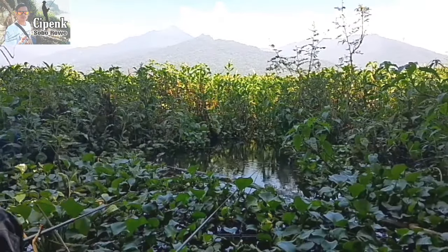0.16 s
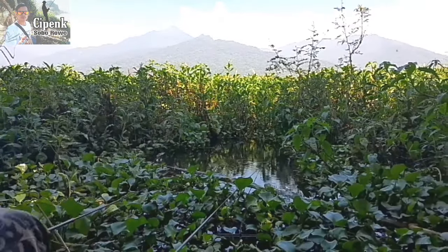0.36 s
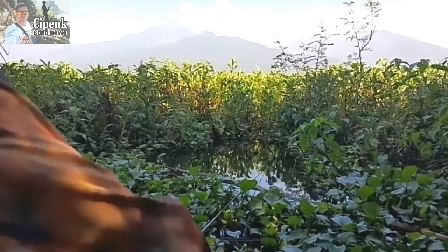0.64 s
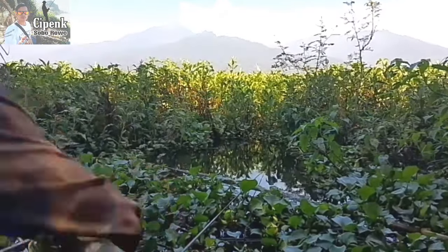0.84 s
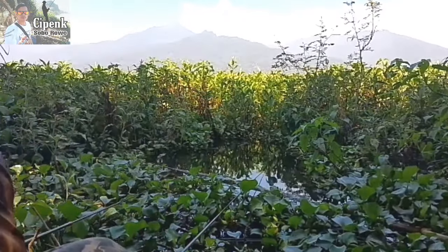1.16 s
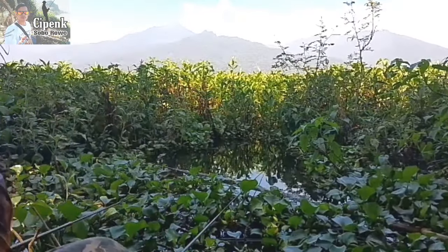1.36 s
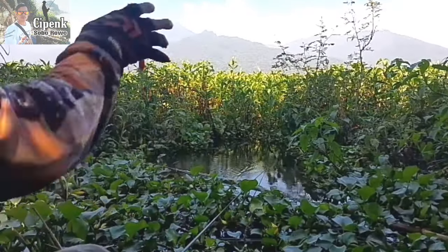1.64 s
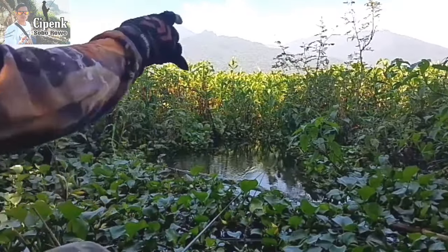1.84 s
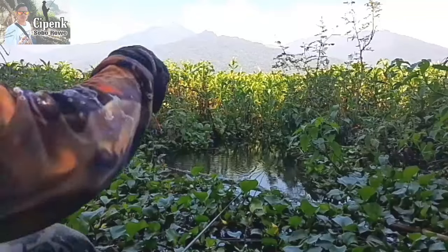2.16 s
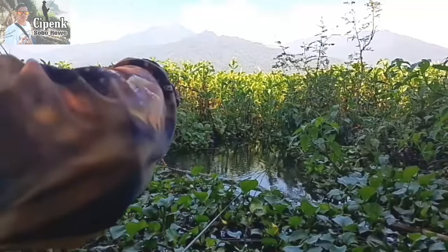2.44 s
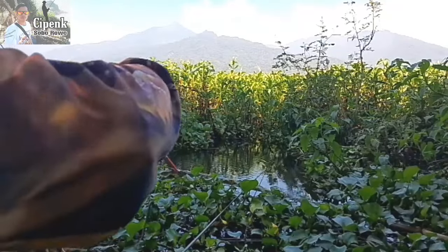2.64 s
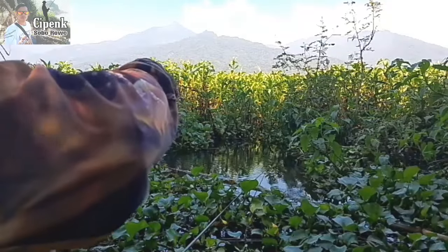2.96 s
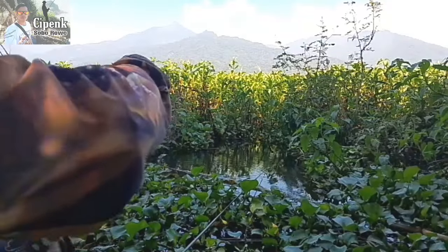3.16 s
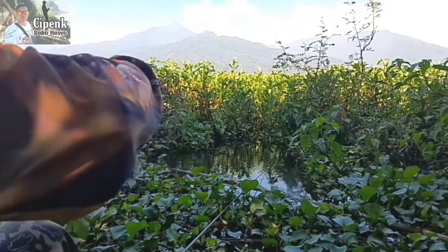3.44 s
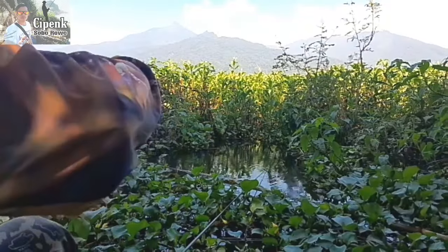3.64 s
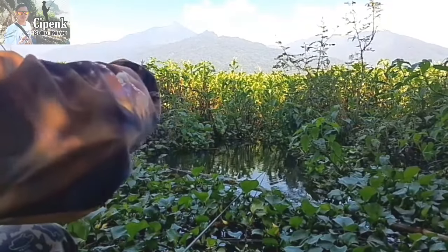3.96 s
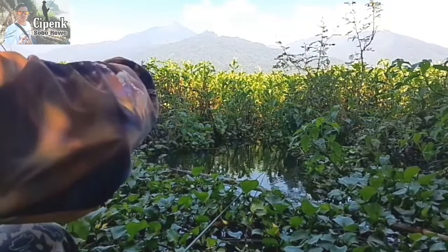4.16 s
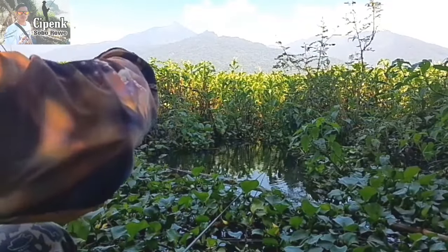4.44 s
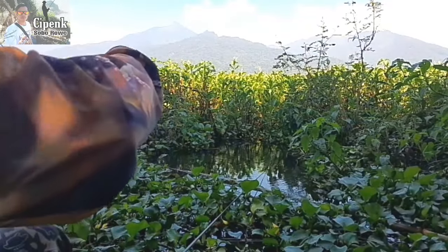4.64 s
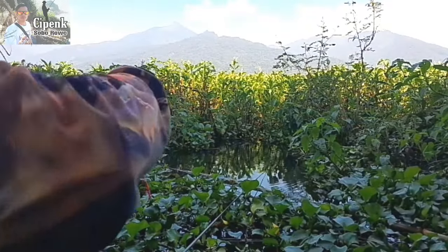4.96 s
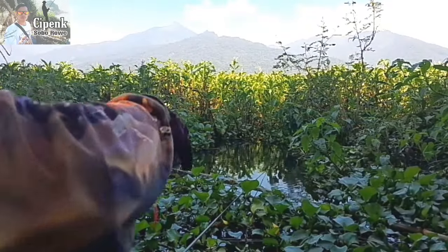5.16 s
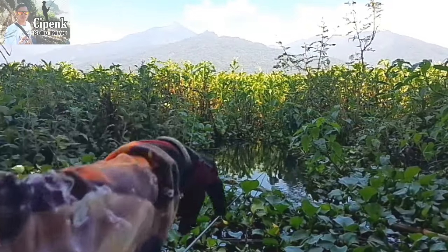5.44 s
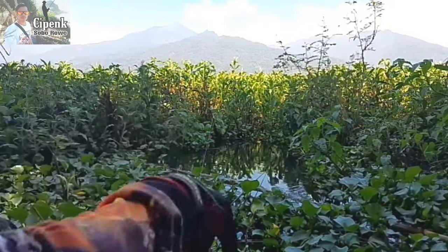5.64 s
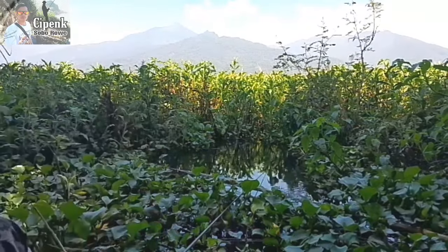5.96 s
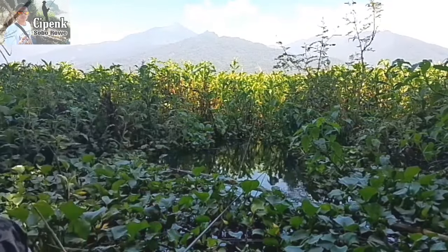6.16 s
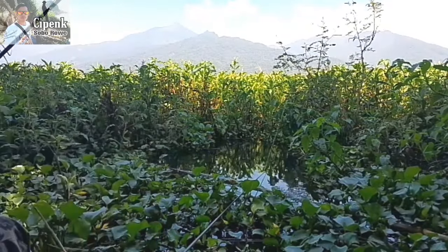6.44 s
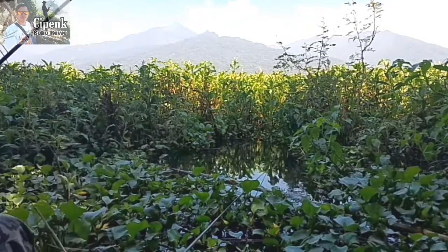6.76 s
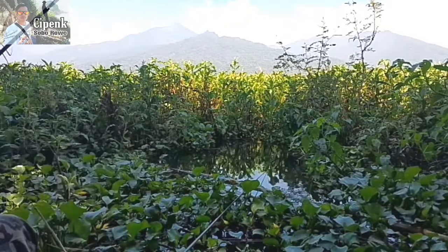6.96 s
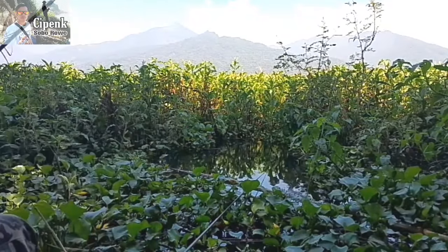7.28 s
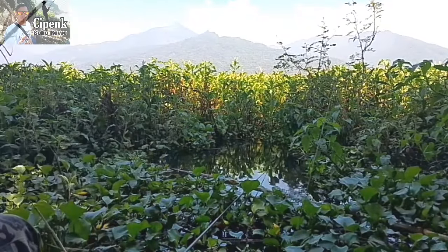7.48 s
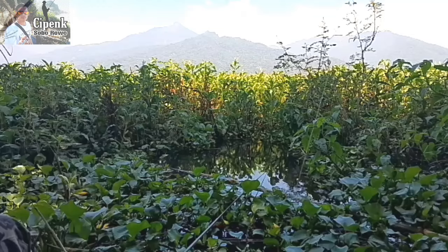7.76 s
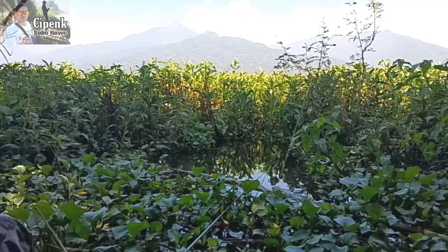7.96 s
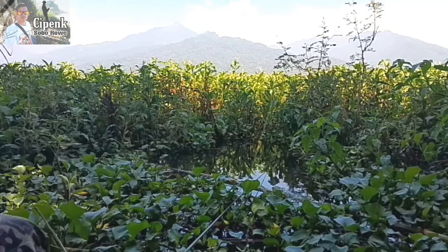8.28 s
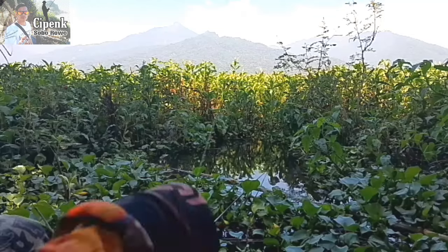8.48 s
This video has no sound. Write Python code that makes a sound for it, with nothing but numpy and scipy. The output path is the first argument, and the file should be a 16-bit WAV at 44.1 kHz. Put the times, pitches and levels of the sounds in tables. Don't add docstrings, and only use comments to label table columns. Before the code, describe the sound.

A deep, surging traffic rumble fills the distance throughout, with a wavering low engine drone, faint breeze hiss and a steady, shrill cricket chorus, all leaning slightly left. At 0 s there is a brief sleeve swish, squeak and creak, then a small tick at 0.16. A bird whistles a soft falling note at 0.5. At 0.6 a reel catch squeaks and snaps brightly, very close; from 0.65 to 1.6 gear drags in stick-slip jerks along resonant hull boards and stops abruptly. A louder, longer falling whistle comes at 1.4, echoing in the reeds. Dull tackle ticks follow around 2.0, 2.3 and 2.8, with faint creaks. From 2.5 to the end another bird chips hoarsely, nearly five times a second, strongest around 6.3. A faint tick falls at 5.0; sharp clicks, line snaps and swishes cluster between 6.8 and 7.4. Background and chips continue to 8.6.

```python
import sys
import numpy as np
from scipy import signal
from scipy.io import wavfile
from scipy.ndimage import uniform_filter1d

SR = 44100
rng = np.random.default_rng(int(sys.argv[2]) if len(sys.argv) > 2 else 0)


def attenuation_scalar(level_db):
    decades = np.asarray(level_db, float) / 20
    return 10 ** decades


def dump(signal):
    limited = np.clip(np.atleast_2d(signal).T, -1, 1)
    pcm = np.round(limited * 32767).astype(np.int16)
    wavfile.write(sys.argv[1], SR, pcm)


N = 379701


def evened(x):
    return x / np.sqrt(np.mean(x ** 2) + 1e-20)


def log_interp(points, hz):
    point_hz, value = np.transpose(points)
    return np.interp(np.log(hz + 1), np.log(point_hz + 1), value)


def along(rows):
    time_s, *columns = np.transpose(rows)
    t = np.arange(N) / SR
    return [np.interp(t, time_s, column) for column in columns]


def bumps(rows, half_s):
    centre_s, *columns = np.transpose(rows)
    t = np.arange(0, N + 200, 200) / SR
    bell = np.exp(-((t[:, None] - centre_s) / half_s) ** 2)
    return [np.interp(np.arange(N) / SR, t, bell @ column) for column in columns]


def add(mix, start_s, sound, pan_db):
    part = mix[:, max(round(start_s * SR), 0):][:, :sound.shape[-1]]
    part += sound[..., :part.shape[1]] * attenuation_scalar([[pan_db / 2], [-pan_db / 2]])


def resonate(x, hz, width_hz):
    turn = np.exp(2j * np.pi * np.cumsum(hz * np.ones(x.shape[-1])) / SR)
    pole = np.exp(-np.pi * width_hz / SR)
    smooth = signal.lfilter([1 - pole], [1, -pole], x / turn + 1e-18)
    return 2 * (turn * smooth).real


def drift(per_s):
    t = np.arange(0, N + 200, 200) / SR
    rates_hz = per_s * np.geomspace(.05, 1, num=16)
    slow = sum(np.sin(2 * np.pi * (f * t + rng.random())) / np.sqrt(f) for f in rates_hz)
    return np.interp(np.arange(N) / SR, t, evened(slow))


# (freq_hz, likeness)
LIKENESS = [(60, 1), (180, 0.9), (550, 0.091), (1650, 0.012), (4970, 0.0), (15000, -0.0)]


def noise(colour, patchy_db, size=1024):
    frames, hz = 4 * N // size + 5, np.fft.rfftfreq(size, 1 / SR)
    a, b, c, d, patches = rng.standard_normal((frames, len(hz), 5)).T
    patches = uniform_filter1d(patches, size=8, axis=0)
    patches = evened(uniform_filter1d(patches, size=12, axis=1))
    same = np.clip(log_interp(LIKENESS, hz), -1, 1)[:, None]
    left, other = a + 1j * b, c + 1j * d
    z = np.array([left, same * left + np.sqrt(1 - same ** 2) * other])
    inside = (hz >= colour[0][0]) & (hz <= colour[-1][0])
    z *= attenuation_scalar(log_interp(colour, hz)[:, None] + patchy_db * patches) * inside[:, None]
    return evened(signal.istft(z, nperseg=size, noverlap=size - size // 4)[1][:, :N])


def reeds(x, t60_s, direct_db):
    length = SR // 2
    slots = np.arange(100, length - 20, 20)
    at = slots + rng.integers(0, 20, (2, len(slots)))
    taps = np.zeros((2, length))
    np.put_along_axis(taps, at, rng.choice([-1., 1.], at.shape), 1)
    taps *= attenuation_scalar(-60 * np.arange(length) / SR / t60_s)
    taps /= np.linalg.norm(taps[0])
    taps[0, 0] = taps[1, 14] = attenuation_scalar(direct_db)
    return signal.fftconvolve(x, taps, axes=1)[:, :N]


# (time_s, pitch_hz, level_db)
DRONE = [(0, 195, -48), (1.7, 196, -46.5), (2.6, 195, -38), (3.6, 192, -45), (4.5, 188, -41),
         (4.85, 188, -29), (5.2, 187, -39), (6, 192, -39), (6.3, 195, -29), (6.6, 189, -42),
         (7.2, 184, -37), (8.61, 184, -73)]


def engine():
    hz, level_db = along(DRONE)
    tone = np.sin(2 * np.pi * np.cumsum(hz + 1.57 * drift(8)) / SR)
    return np.sqrt(2) * attenuation_scalar(level_db + 2.0 * drift(6)) * tone


# (freq_hz, density_db)
RUMBLE_COLOUR = [(12, -64), (20, -53), (27, -27), (29, -43), (41, -10), (70, 1.5), (129, -9.5), (168, -13),
                 (193, -14.5), (215, -16), (303, -25.5), (406, -36), (800, -56.5), (1040, -59.5),
                 (1760, -120)]
# (time_s, level_db)
TRAFFIC = [(0, -28), (.9, -26), (1.3, -22.5), (1.9, -27), (2.7, -28.5), (3.5, -25.5), (4.3, -28),
           (5.1, -27.5), (5.6, -28), (6.5, -27), (7.4, -25.5), (8.61, -26)]
# (centre_s, thud_db, roar_db)
SURGES = [(0.0, 12, -12), (.07, -5, 3), (.41, 6, 3.5), (.6, 0.5, 4), (.74, 2.5, -3), (1.05, -5, 7),
          (1.51, -3, 4), (1.75, 6.5, 4), (1.87, 4, -1), (2.52, 4.5, 4), (2.92, -6, 6.5), (3.4, 4, 0),
          (3.5, -3, 7), (3.6, 4, 3), (3.76, 4, 4), (3.88, -10, -1.5), (4.0, 9.5, 0.5), (4.15, -10, -3.5),
          (4.82, -15, -2.5), (4.89, 8.5, 4.5), (5.54, 7, 2.5), (5.68, 3.5, 4.5), (5.83, 11.5, -6),
          (6.14, -3, 7.5), (7.29, 7, -7), (7.43, 5.5, -0.5), (7.6, 3, -1), (7.9, 3.5, 3.5), (8.18, 4, 3),
          (8.32, 4, -2)]
SURGE_HALF_S, ROAR_UNDER_DB, WASH_DB = 0.042, -1.5, -36.5


def traffic():
    bass = noise(RUMBLE_COLOUR, patchy_db=1.0, size=4096)
    deep, low = (signal.oaconvolve(bass, signal.firwin(4001, edge_hz, fs=SR)[None], "same")
                 for edge_hz in (88, 170))
    roar = low - deep
    deep_swell, roar_swell = (np.sqrt(uniform_filter1d((layer ** 2).mean(0), size=6000))
                              for layer in (deep, roar))
    deep_db, roar_db = along(TRAFFIC)[0] + np.array(bumps(SURGES, SURGE_HALF_S))
    thuds = attenuation_scalar(deep_db) * deep / deep_swell
    roars = attenuation_scalar(roar_db + ROAR_UNDER_DB) * roar / roar_swell
    return thuds + roars + attenuation_scalar(WASH_DB) * evened(bass - low)


# (freq_hz, density_db)
AIR = [(300, -15), (500, -3), (1000, -6), (2500, -7.5), (5000, -11.5), (6000, -10.5), (9000, -9),
       (10500, -14.5), (14000, -9), (15500, -8.5)]
# (centre_s, lift_db)
GUSTS = [
    (0, 6),
    (7.2, 4),
]
GUST_HALF_S, AIR_DB = 0.28, -51.0


def air():
    return attenuation_scalar(AIR_DB + bumps(GUSTS, GUST_HALF_S)[0]) * noise(AIR, patchy_db=1.5)


# (time_s, level_db)
CHORUS = [(0.0, -40.5), (0.62, -40), (0.89, -43), (1.41, -39), (2.28, -42.5), (3.07, -40), (4.15, -41.5),
          (5.49, -40), (6.09, -38), (6.47, -39.5), (7.58, -39.5), (8.61, -41)]
# (freq_hz, density_db)
MASS = [(5900, -33), (6090, -28), (6200, -12), (6320, -19.5), (6400, 2), (6550, -2), (6700, 0.5),
        (6900, -0.5), (7200, 0), (7600, -5), (8250, -11), (8900, -25), (9500, -35)]
# (wing_hz, over_chorus_db, strokes_per_s, chirps_per_s, pan_db)
CRICKETS = [(6435, -9, 68, .7, 2), (6655, -10, 92, .9, 1), (6710, -10, 92, 1.3, -1),
            (7000, -15, 81, 2.2, 2), (7160, -14, 146, 3, 0), (7250, -14, 92, 1.7, 1),
            (7530, -15, 128, 5, 1)]
DEPTH_SLOW, DEPTH_PER_CHIRP, DEPTH_MOST = .26, .19, 0.46


def chorus():
    near = np.zeros((2, N))
    for wing_hz, level_db, strokes_per_s, chirps_per_s, pan_db in CRICKETS:
        depth = min(DEPTH_SLOW + DEPTH_PER_CHIRP * chirps_per_s, DEPTH_MOST)
        stroke_phase = 2 * np.pi * np.cumsum(strokes_per_s * (1 + .02 * drift(5))) / SR
        chirp_phase = 2 * np.pi * np.cumsum(chirps_per_s * (1 + 0.34 * drift(1))) / SR
        stroke = 1 + .7 * np.cos(stroke_phase)
        chirp = 1 + depth * np.sin(chirp_phase + 6 * rng.random())
        wing = np.sin(2 * np.pi * np.cumsum(wing_hz + 13.64 * drift(30)) / SR)
        add(near, 0, attenuation_scalar(level_db) * evened(stroke * chirp * wing), pan_db)
    mass = attenuation_scalar(2.0) * noise(MASS, patchy_db=1.5, size=512)
    return attenuation_scalar(along(CHORUS)[0]) * (mass + reeds(near, t60_s=0.35, direct_db=-9.0))


# (multiple_of_pitch, level_db)
OVERTONES = [(1, -16), (2, 4.5)]
# (freq_hz, width_hz, level_db)
BEAK = [(2950, 800, -2), (3600, 700, -1), (4050, 500, 1), (4400, 350, 2)]
CHIP_HZ, CHIP_PEAK_S, CHIP_ARCH_HZ = 2225, .032, 62
CHIP_DB, CHIP_RISE_S, CHIP_FADE_DB_PER_S = 3.5, 0.01, 186
RASP_DB, RASP_PEAK_S, RASP_RISE_DB_PER_S, RASP_FADE_DB_PER_S = -2, .036, 900, 300


def chip(detune, breath):
    t = np.arange(len(breath)) / SR
    hz = CHIP_HZ - CHIP_ARCH_HZ * (t / CHIP_PEAK_S - 1) ** 2
    tone_db = CHIP_DB - 20 * np.maximum(1 - t / CHIP_RISE_S, 0) - CHIP_FADE_DB_PER_S * t
    late_s = t - RASP_PEAK_S
    rasp_db = RASP_DB - np.maximum(-RASP_RISE_DB_PER_S * late_s, RASP_FADE_DB_PER_S * late_s)
    waver = 0.024 * evened(uniform_filter1d(breath, size=90))
    turns = np.cumsum(hz * detune * (1 + waver)) / SR
    tone = sum(attenuation_scalar(level_db) * np.sin(2 * np.pi * k * turns) for k, level_db in OVERTONES)
    rasp = 0
    for mode_hz, width_hz, level_db in BEAK:
        mode = np.roll(breath, mode_hz)
        mode = resonate(resonate(mode, mode_hz, width_hz), mode_hz, width_hz)
        rasp = rasp + attenuation_scalar(level_db) * evened(mode)
    return (attenuation_scalar(tone_db) * tone + attenuation_scalar(rasp_db) * evened(rasp)) * signal.windows.tukey(len(t), .1)


# (peak_s, peak_db)
CHIPS = [(2.504, -44), (2.6932, -45.5), (2.903, -45.5), (3.127, -47), (3.3438, -47), (3.548, -45.5),
         (3.773, -45.5), (4.01, -47), (4.2783, -47), (4.4907, -47), (4.6872, -44), (4.879, -45),
         (5.0638, -44.5), (5.257, -43.5), (5.447, -44), (5.68, -45.5), (5.879, -43.5), (6.0696, -43.5),
         (6.2566, -41), (6.4507, -41), (6.6518, -43.5), (6.85, -43.5), (7.055, -44.5), (7.259, -43),
         (7.4738, -43.5), (7.707, -46.5), (7.9156, -44), (8.143, -44.5), (8.353, -45), (8.5809, -46)]
CHIP_LEAD_S, CHIP_S = .01, .093


def chipping_bird():
    chips = np.zeros((2, N))
    for start_s, peak_db in CHIPS:
        breath = rng.standard_normal(round(CHIP_S * SR))
        note = chip(rng.normal(1, 0.0051), breath)
        add(chips, start_s - CHIP_LEAD_S, attenuation_scalar(peak_db) * note, pan_db=1.9)
    return reeds(chips, t60_s=.3, direct_db=-3)


SETTLE_HZ, FALL_MID_S, FALL_S = 2630, .026, .016
WHISTLE_PEAK_S, SWELL_DB_PER_S, SINK_DB, SINK_S = .03, 560, -22, .065


def whistle(length_s, top_hz, peak_db):
    t = np.arange(0, length_s, 1 / SR)
    hz = SETTLE_HZ + (top_hz - SETTLE_HZ) / (1 + np.exp((t - FALL_MID_S) / FALL_S))
    late_s = t - WHISTLE_PEAK_S
    sink_db = SINK_DB * (1 - np.exp(-abs(late_s) / SINK_S))
    level_db = peak_db + np.where(late_s < 0, SWELL_DB_PER_S * late_s, sink_db)
    waver = evened(uniform_filter1d(rng.standard_normal(SR // 2), size=30))[:len(t)]
    tone = np.sin(2 * np.pi * np.cumsum(hz * (1 + .035 * waver)) / SR)
    return np.sqrt(2) * attenuation_scalar(level_db) * tone * signal.windows.tukey(len(t), .1)


# (start_s, length_s, top_hz, peak_db)
WHISTLES = [
    (0.478, 0.14, 5370, -29.5),
    (1.418, 0.204, 5300, -19),
]


def whistling_bird():
    whistles = np.zeros((2, N))
    for start_s, *shape in WHISTLES:
        add(whistles, start_s, whistle(*shape), pan_db=0.5)
    return reeds(whistles, t60_s=.52, direct_db=-6)


# (time_s, level_db)
DRAG = [(0.64, -59.5), (0.766, -48), (.9, -43), (1.1, -43), (1.3, -41), (1.45, -42), (1.596, -43.5)]
# (centre_s, lift_db)
JERKS = [
    (.77, 4.5),
    (.875, 7),
    (.985, 1),
    (1.025, 6),
    (1.15, 2.5),
    (1.29, -2),
    (1.33, 5.5),
    (1.51, -3),
    (1.59, -3),
]
# (freq_hz, density_db)
DRAG_COLOUR = [(100, -15), (176, -5), (375, -22.5), (800, -20.5), (1200, -24), (2500, -24), (3760, -23.5),
               (5000, -34), (7000, -30), (10000, -44.5), (12000, -75), (15000, -66)]
# (freq_hz, width_hz, level_db)
HULL = [(109, 4.8, -4), (169.9, 5, 16), (321, 8.9, 3.5), (414, 27, 1), (926, 48, 5), (2660, 70, -33),
        (3770, 150, -6)]
JERK_HALF_S, RUB_DB = .022, 13.5
RING_FOLLOWS, RING_DB = 0.58, -19.5


def drag():
    t = np.arange(N) / SR
    pull_db = along(DRAG)[0] + bumps(JERKS, JERK_HALF_S)[0]
    moving = uniform_filter1d(1. * ((t > DRAG[0][0]) & (t < DRAG[-1][0])), size=100)
    rub = noise(DRAG_COLOUR, patchy_db=2.4, size=512)
    rub *= attenuation_scalar(pull_db + RUB_DB + 1.2 * drift(60))
    shake = rng.standard_normal((2, 2 * SR))
    shake[1] = 0.79 * np.roll(shake[0], 12) + 0.86 * shake[1]
    hull = np.zeros((2, N))
    for mode_hz, width_hz, level_db in HULL:
        drive = shake if mode_hz > 600 else shake[0]
        hull[:, :2 * SR] += attenuation_scalar(level_db) * evened(resonate(drive, mode_hz, width_hz))
    ring = attenuation_scalar(RING_FOLLOWS * pull_db + RING_DB) * hull
    return moving * (rub + ring) * attenuation_scalar([[1.1], [-1.1]])


# (start_s, peak_db, main_hz, second_hz, t60_s)
TICKS = [(0.161, -31, 905, 1900, 0.0087), (.679, -33, 1400, 950, 0.038), (1.912, -42, 3000, 700, .008),
         (2.006, -30, 1820, 730, 0.0057), (2.273, -27, 1900, 610, 0.0039), (2.511, -42, 1300, 1800, .012),
         (2.788, -35, 1400, 734, 0.0075), (5.033, -36.5, 654, 770, 0.025), (6.254, -40, 530, 480, 0.035),
         (6.799, -38, 1700, 2530, 0.023), (6.962, -18.5, 2460, 2120, 0.028), (7.019, -34, 600, 1100, .01),
         (7.047, -26, 1310, 714, 0.018), (7.166, -23, 2450, 3600, 0.015), (7.365, -39, 760, 930, 0.03)]
SECOND_RING_DB = -2.5


def ticks():
    out, t = np.zeros((2, N)), np.arange(3000) / SR
    for start_s, peak_db, main_hz, second_hz, t60_s in TICKS:
        rough = 1 + 0.62 * uniform_filter1d(rng.standard_normal(len(t)), size=8)
        rings = np.sin(2 * np.pi * main_hz * t)
        rings += attenuation_scalar(SECOND_RING_DB) * np.sin(2 * np.pi * second_hz * t)
        tick = rough * rings * attenuation_scalar(-60 * t / max(t60_s, .004))
        add(out, start_s, attenuation_scalar(peak_db) * np.array([tick, np.roll(tick, 4)]), pan_db=2.1)
    return out


# (start_s, length_s, centre_hz, level_db, pan_db)
SLEEVE = [(0, 0.15, 6000, -44.5, 8), (.001, 0.034, 3540, -43, 10), (0.199, 0.11, 9000, -49, 5),
          (0.636, 0.083, 11000, -43.5, -3), (1.583, 0.15, 4700, -47.5, -1), (1.914, .06, 10000, -54, 1),
          (6.221, 0.38, 1200, -58.5, 1), (6.959, 0.08, 2700, -41.5, 1), (7.159, 0.093, 2800, -46.5, 0),
          (7.204, 0.066, 13400, -48, 11), (7.393, 0.078, 12000, -52, 9)]
# (start_s, length_s, centre_hz, level_db, pan_db)
CREAKS = [
    (0, 0.033, 12500, -38, 15),
    (0.001, 0.187, 890, -45, 1),
    (0.173, 0.17, 2040, -58, 6),
    (.597, 0.057, 2740, -31.5, 6),
    (.598, .01, 9000, -40, 5),
    (0.6162, 0.0031, 6250, -17, 4),
    (2.707, 0.19, 1230, -55.5, 5),
    (2.77, 0.13, 1730, -50.5, 1),
    (2.789, 0.073, 1520, -46, -1),
    (4.004, 0.41, 613, -62, 1),
]
# (start_s, length_s, centre_hz, level_db, pan_db)
SNAPS = [
    (0.606, 0.018, 9100, -46, -12),
    (0.615, 0.029, 11100, -22, 1.5),
    (0.619, 0.0013, 12500, -13, 8),
    (0.632, 0.011, 1180, -33.5, -1),
    (6.962, 0.005, 7000, -29, -1),
    (7.164, .006, 3550, -32.5, 0),
    (7.368, 0.008, 3200, -41, 1),
]
SLEEVE_WIDE, CREAK_WIDE, SNAP_WIDE = 1, 0.2, 0.83


def swishes():
    out = np.zeros((2, N))
    for wide, rows in ((SLEEVE_WIDE, SLEEVE), (CREAK_WIDE, CREAKS), (SNAP_WIDE, SNAPS)):
        for start_s, length_s, centre_hz, level_db, pan_db in rows:
            puff = rng.standard_normal((2, 16000))[:, :round(length_s * SR)]
            width_hz = wide * centre_hz
            puff = evened(resonate(resonate(puff, centre_hz, width_hz), centre_hz, width_hz))
            length = puff.shape[1]
            fade = signal.windows.tukey(length, .4) * attenuation_scalar(np.linspace(3, -6, num=length))
            add(out, start_s, attenuation_scalar(level_db) * puff * fade, pan_db)
    return out


def tackle():
    near = ticks() + swishes()
    return near + attenuation_scalar(-13) * reeds(near, t60_s=.15, direct_db=-40)


def scene():
    background = (traffic() + engine() + air() + chorus()) * attenuation_scalar([[.4], [-.4]])
    birds = chipping_bird() + whistling_bird()
    return background + birds + drag() + tackle()


def band_limit(x):
    return signal.sosfilt(signal.butter(12, 15800, fs=SR, output="sos"), x)


def record(dry):
    bass_cut = signal.butter(6, 41, "high", fs=SR, output="sos")
    mix = signal.sosfilt(bass_cut, dry)
    mix = signal.oaconvolve(mix, signal.firwin(301, 15500, fs=SR)[None], "same")
    return band_limit(mix)


dry = scene()
out = record(dry)
dump(out)
```